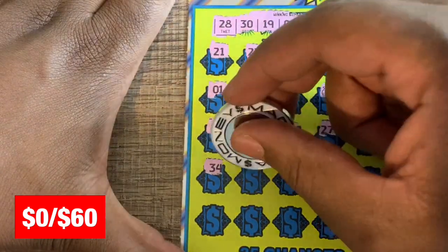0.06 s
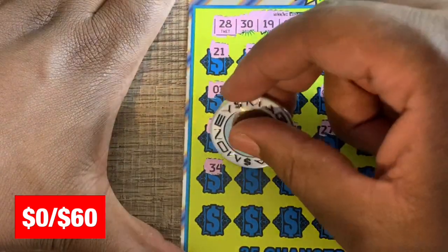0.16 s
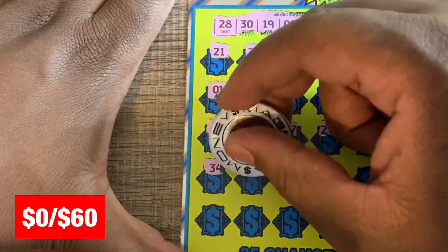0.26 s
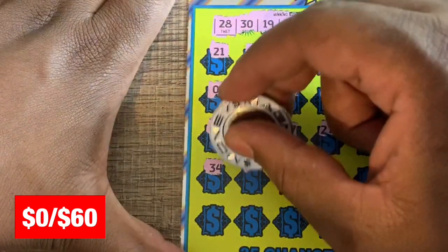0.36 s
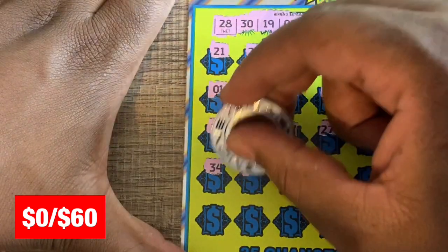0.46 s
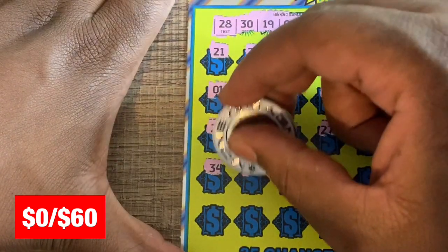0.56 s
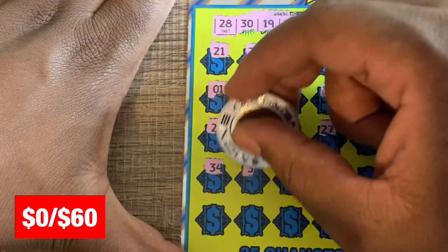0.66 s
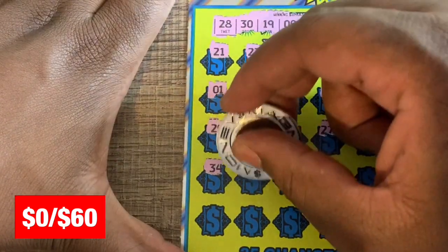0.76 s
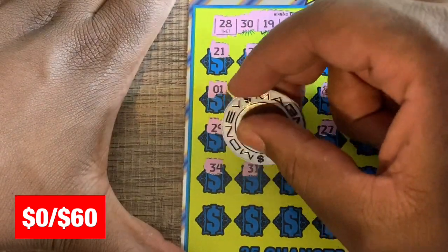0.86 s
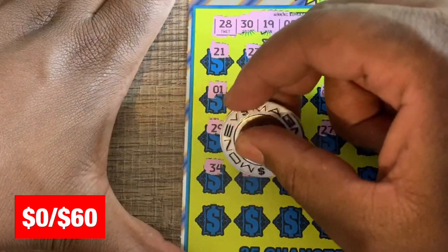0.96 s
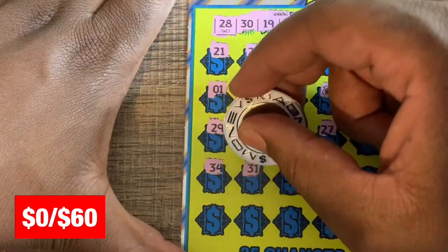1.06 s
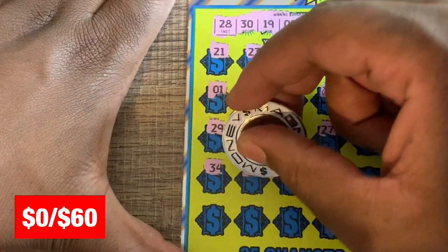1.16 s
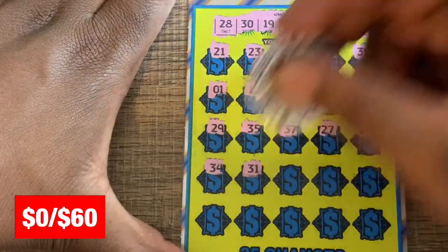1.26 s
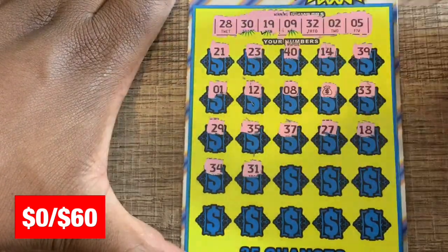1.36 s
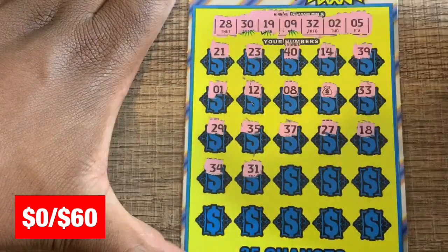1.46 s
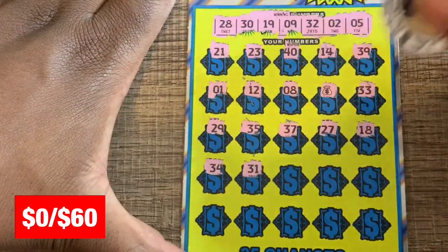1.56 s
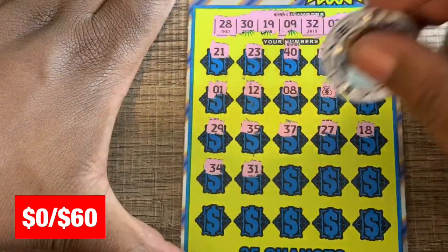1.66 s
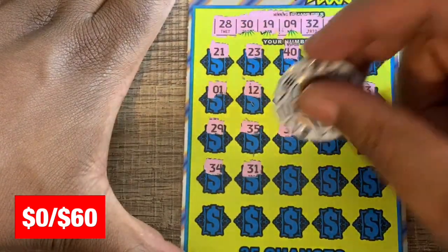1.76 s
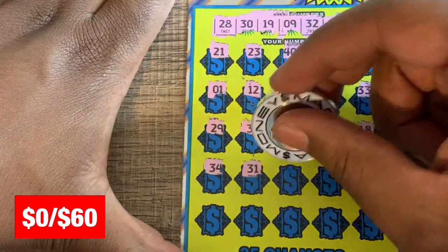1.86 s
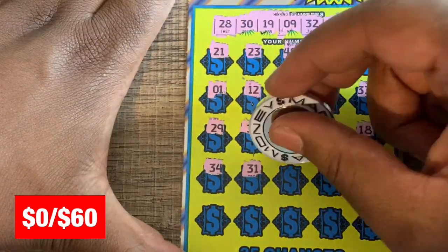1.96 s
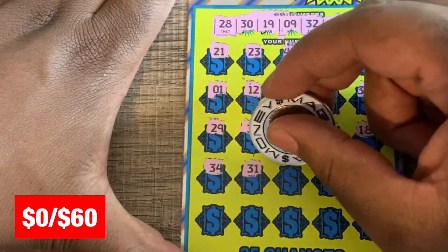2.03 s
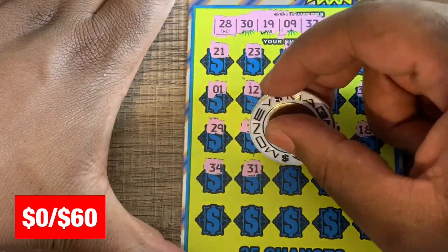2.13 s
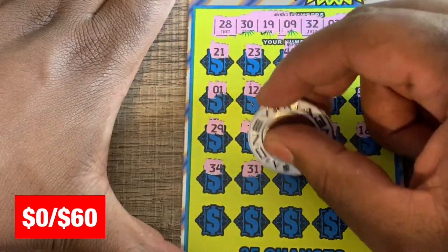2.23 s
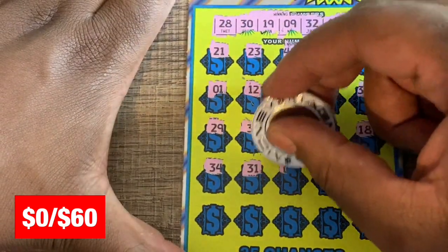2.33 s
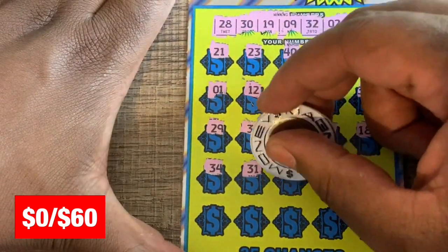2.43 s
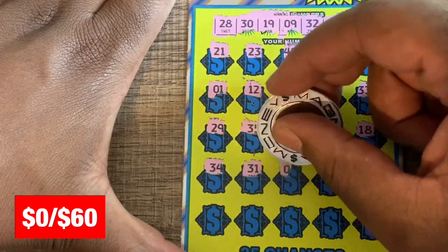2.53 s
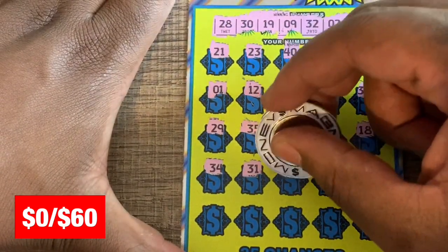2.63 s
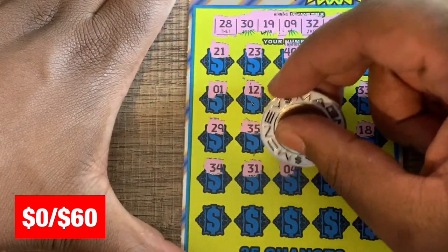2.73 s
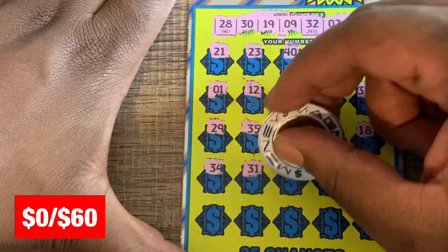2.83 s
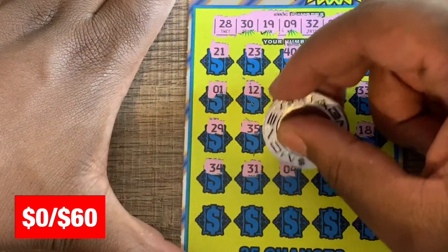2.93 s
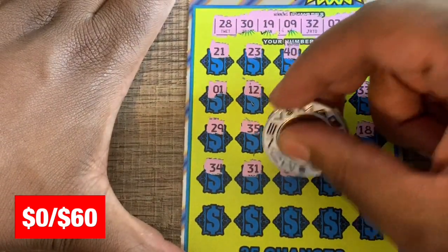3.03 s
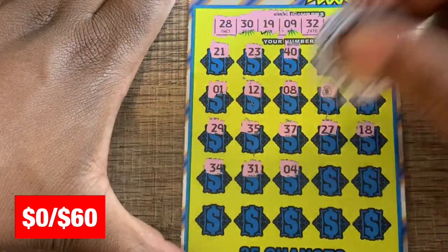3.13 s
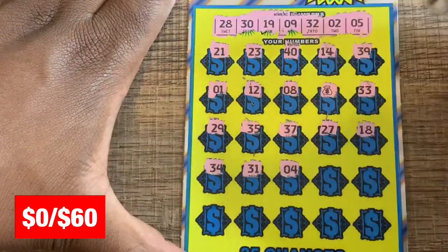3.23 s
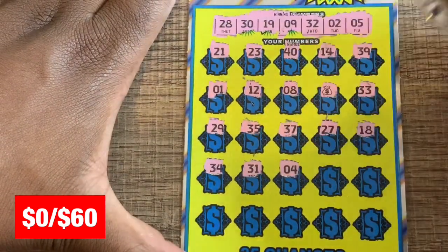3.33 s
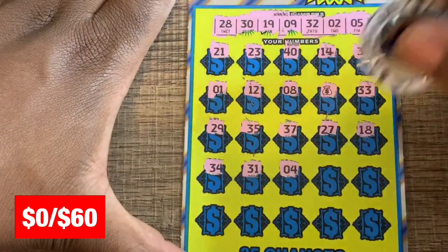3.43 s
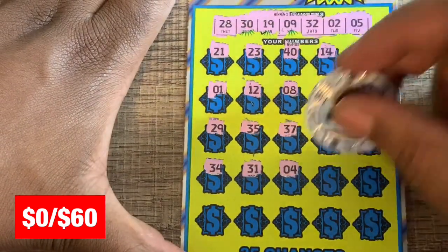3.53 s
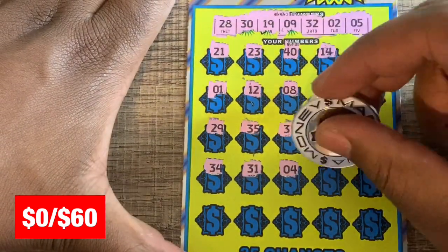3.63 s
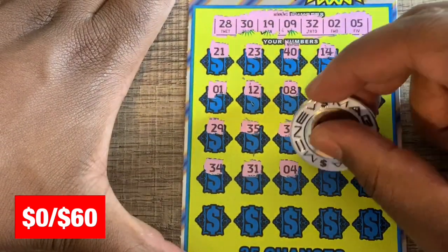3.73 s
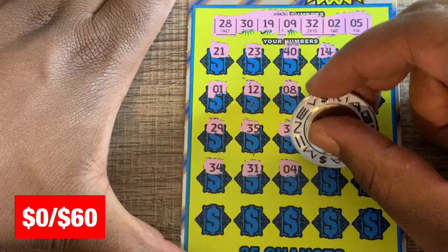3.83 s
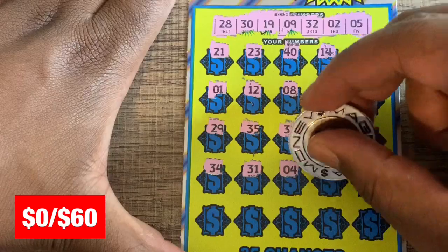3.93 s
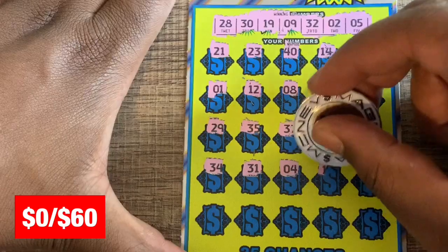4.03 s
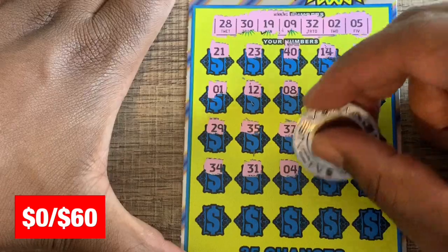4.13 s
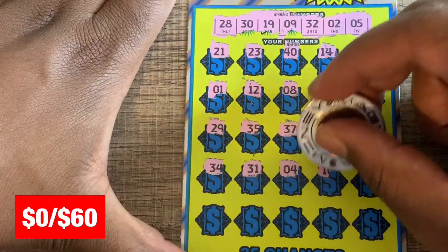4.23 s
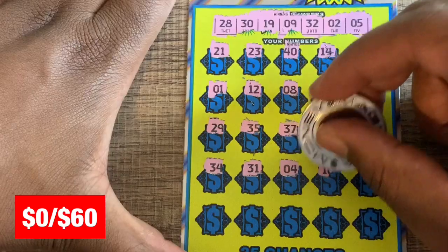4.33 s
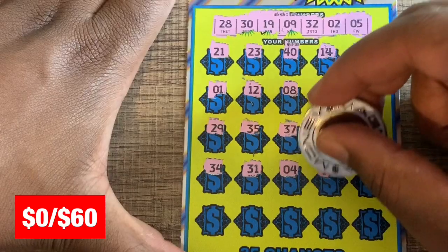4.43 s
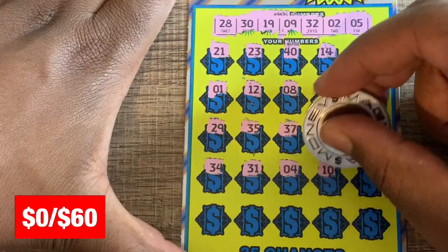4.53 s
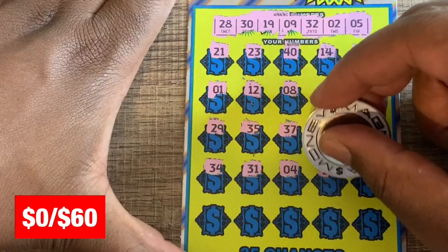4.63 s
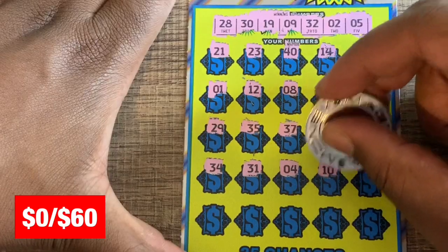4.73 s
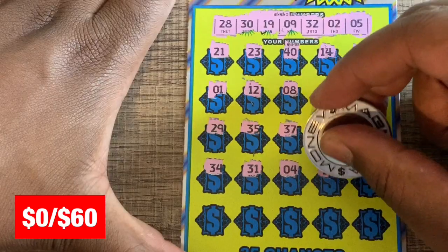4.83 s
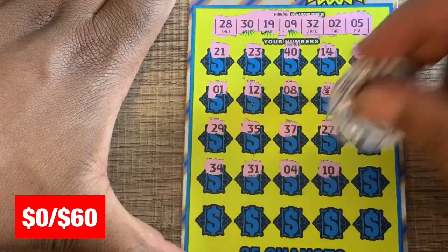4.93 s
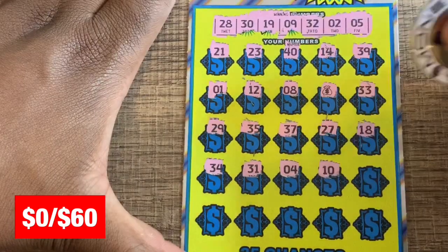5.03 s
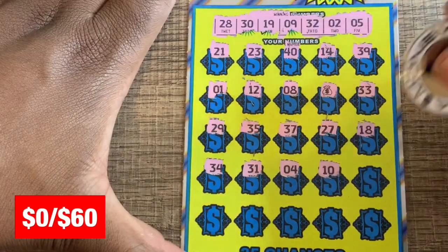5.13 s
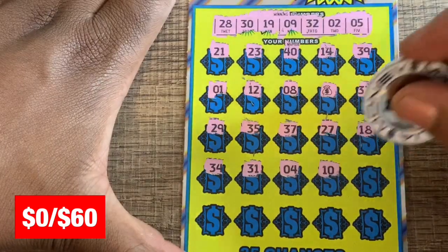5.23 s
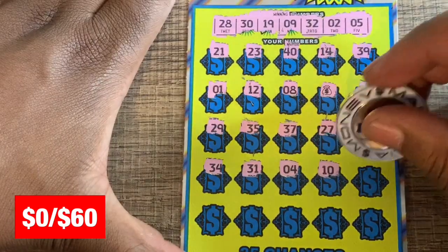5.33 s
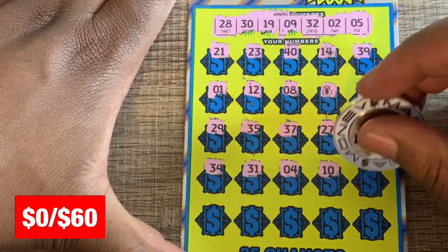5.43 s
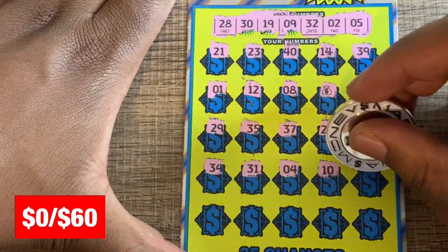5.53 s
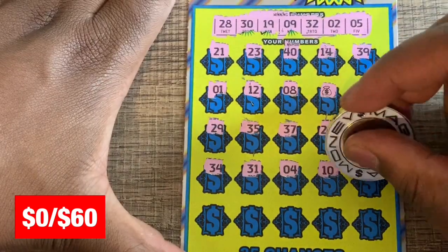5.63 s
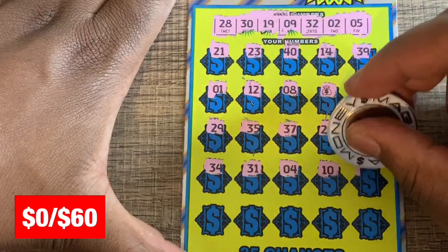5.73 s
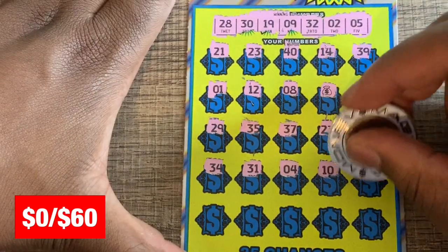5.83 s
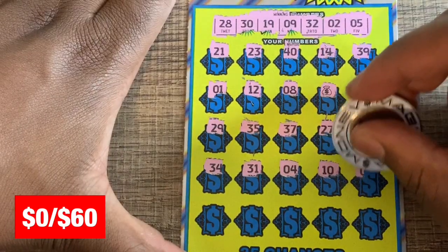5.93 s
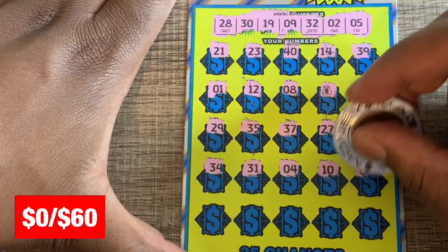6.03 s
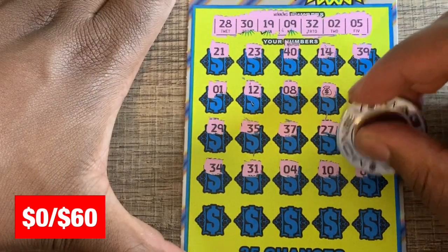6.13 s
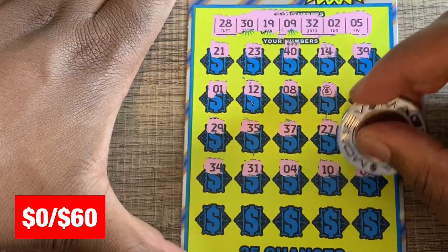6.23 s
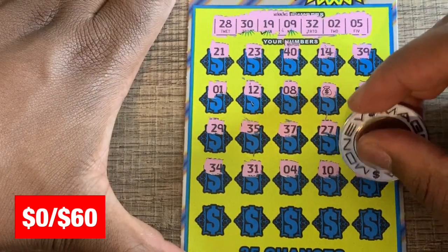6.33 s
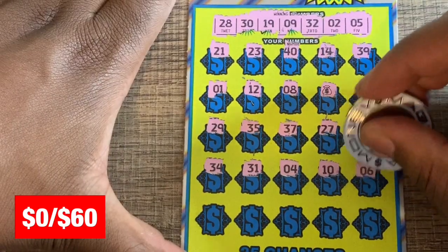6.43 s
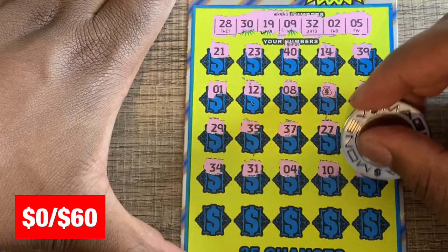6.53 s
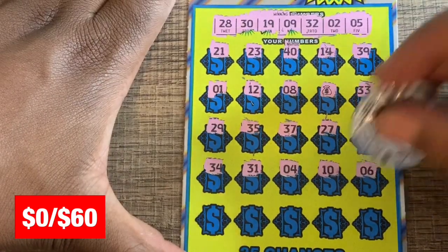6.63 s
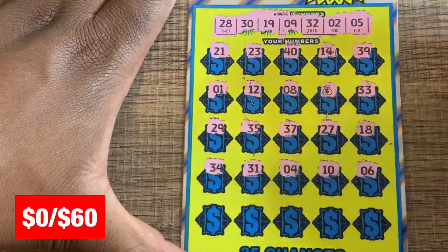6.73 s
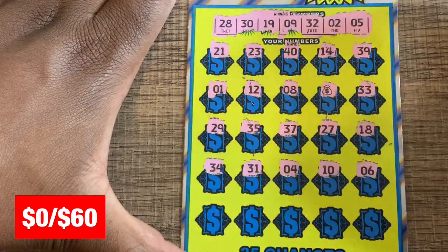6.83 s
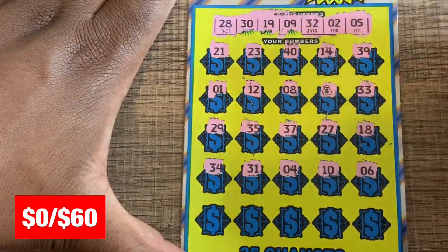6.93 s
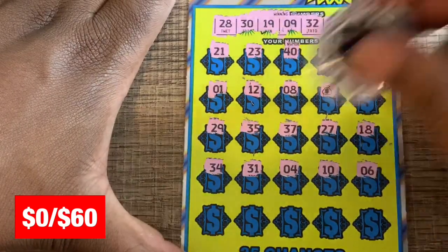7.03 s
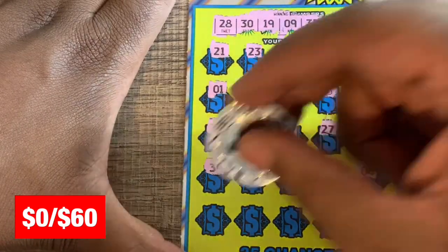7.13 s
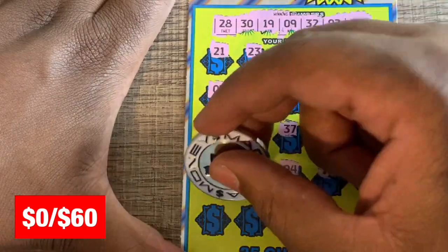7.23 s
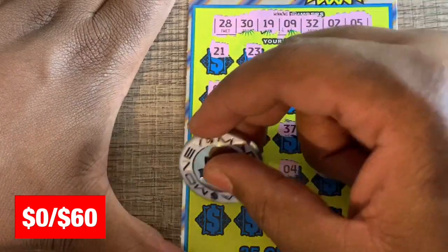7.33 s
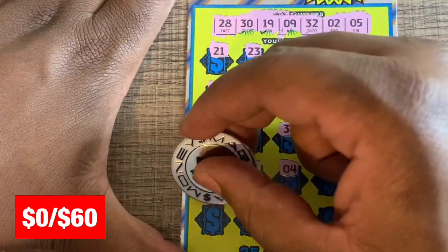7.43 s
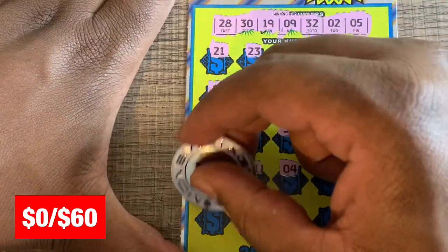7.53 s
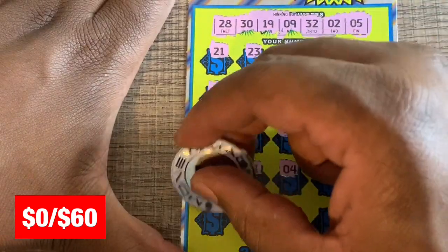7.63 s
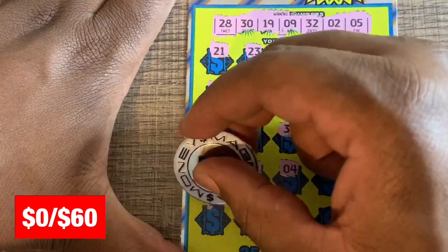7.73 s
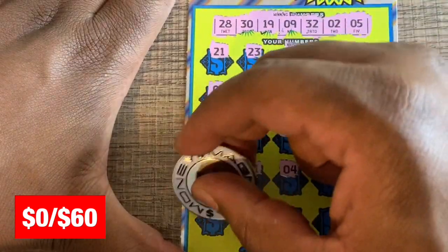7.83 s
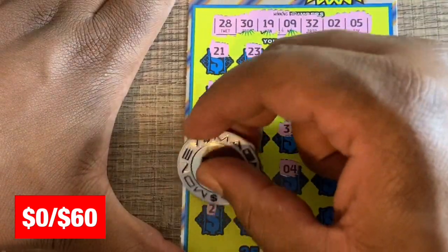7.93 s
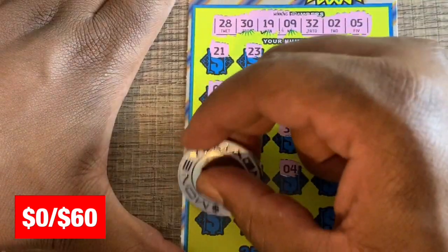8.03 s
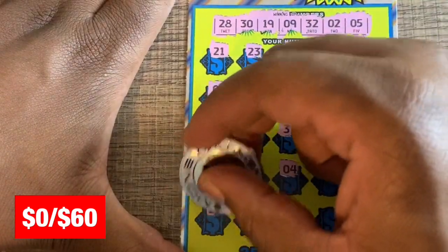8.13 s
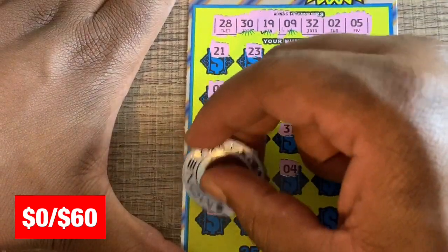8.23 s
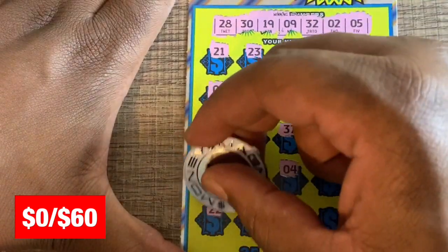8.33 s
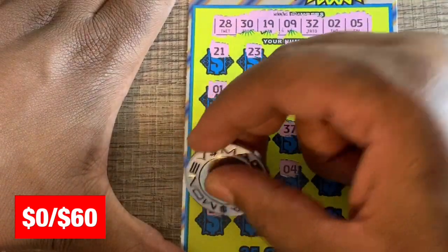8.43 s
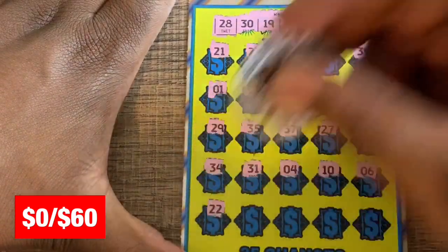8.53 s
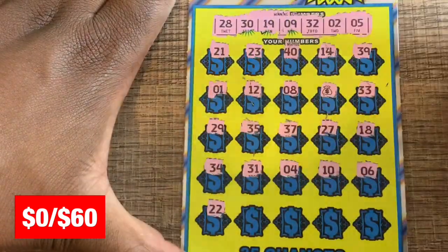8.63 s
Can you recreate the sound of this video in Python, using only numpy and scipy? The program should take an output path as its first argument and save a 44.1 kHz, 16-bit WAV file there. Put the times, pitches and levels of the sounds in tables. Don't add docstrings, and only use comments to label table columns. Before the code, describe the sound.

A metal token scratches coating off a paper card on a wooden table, very close to a stereo microphone in a quiet room. Five bursts of rapid back-and-forth scrapes each start with a sharp knock and end with a tick and soft brush of the hand. Light knocks, small squeaks and low table rumble mix with the scratching; faint hiss and hum fill the pauses.

```python
import sys
import numpy as np
from scipy import signal
from scipy.fft import rfft, irfft
from scipy.io import wavfile
from scipy.ndimage import uniform_filter1d

SR = 44100
rng = np.random.default_rng(int(sys.argv[2]) if len(sys.argv) > 2 else 0)


def bounce(signal):
    frames = np.transpose(np.atleast_2d(signal))
    limited = np.clip(frames, -1, 1)
    pcm = np.round(limited * 32767).astype(np.int16)
    wavfile.write(sys.argv[1], SR, pcm)


def voltage_ratio(decibels):
    exponent = np.asarray(decibels, float) / 20
    return 10 ** exponent


N = 383229
HZ = np.fft.rfftfreq(N, 1 / SR)

# (from [s], level of ring 1 [dB], of ring 2 [dB], of ring 3 [dB])
GRIPS = [
    (0, -1, -18, -0.7),
    (2, -18, -0.5, -3.5),
    (3.7, -1.5, -24, -0.5),
    (5.5, 7, -40, -0.5),
    (7.3, -13.5, -27, 2),
]
# (frequency [Hz], density [dB per Hz])
TABLE_COLOUR = [(70, -34), (130, -3), (260, -5.5), (400, -6), (520, -3), (760, -9.5), (1100, -2.5),
                (1600, -7.5), (1800, -12.5), (2100, -16), (2600, -20.5), (3400, -57.5)]
# (frequency [Hz], phase [rad])
PORT_PHASE = [(550, 0), (1030, -1.1), (1900, -9.4), (2400, -9.4), (3000, -12.9), (3900, -13.1),
              (4700, -15.6), (8200, -16.7), (16000, -1.4)]


def evened(x):
    return x / np.sqrt(np.mean(x ** 2) + 1e-20)


def read(points, hz):
    f, value = np.transpose(points)
    return np.interp(np.log(hz + 1), np.log(f + 1), value)


def add(mix, s, sound):
    part = mix[..., round(s * SR):][..., :sound.shape[-1]]
    part += sound[..., :part.shape[-1]]


def through(x, response):
    return signal.oaconvolve(np.atleast_2d(x), np.atleast_2d(response), axes=1)[:, :N]


def resonate(x, hz, width_hz):
    b, a = signal.iirpeak(hz, hz / width_hz, SR)
    return signal.lfilter(b, a, x) * np.sqrt(SR / (np.pi * width_hz))


def smooth_noise(size):
    noise = rng.standard_normal(N)
    return evened(uniform_filter1d(uniform_filter1d(noise, size), size))


def causal(colour, modes=(), size=8192):
    hz = abs(np.fft.fftfreq(size, 1 / SR))
    gain = voltage_ratio(read(colour, hz))
    for f, width_hz, db in modes:
        gain = gain * np.sqrt(1 + (voltage_ratio(2 * db) - 1) / (1 + (2 * (hz - f) / width_hz) ** 2))
    spectrum = np.exp(np.conj(signal.hilbert(np.log(gain + 1e-5))))
    response = np.fft.ifft(spectrum).real[:size // 2]
    return response / np.linalg.norm(response)


def ringing(t60_table, onset_s, gap=20, size=16384):
    taps = np.zeros((2, size))
    at = np.arange(0, size - gap, gap) + rng.integers(0, gap, (2, (size - 1) // gap))
    np.put_along_axis(taps, at, rng.choice([-1., 1.], at.shape), 1)
    hz, t, z = signal.stft(taps, SR, nperseg=512)
    t60_s = read(t60_table, hz)[:, None]
    tail = signal.istft(z * voltage_ratio(-60 * t / t60_s) / np.sqrt(t60_s), SR, nperseg=512)[1]
    tail *= np.clip(np.arange(tail.shape[1]) / SR / onset_s, 0, 1)
    return tail / np.linalg.norm(tail, axis=1, keepdims=True)


def off_the_hand(echo_db, count=6, size=90):
    taps = np.zeros((2, size))
    at = rng.integers(4, size, (2, count))
    np.put_along_axis(taps, at, voltage_ratio(echo_db) * rng.standard_normal((2, count)), 1)
    taps[:, 0] = 1
    return taps / np.linalg.norm(taps, axis=1, keepdims=True)


def grit(per_s, spread_db, flutter_db):
    slips = rng.standard_normal(N) * (rng.random(N) < per_s / SR)
    sizes = voltage_ratio(spread_db * np.minimum(rng.exponential(1, N), 4))
    pressure = voltage_ratio(flutter_db * smooth_noise(150))
    return evened(slips * sizes * pressure)


def away_from(peak, size):
    u, peak = np.linspace(0, 1, size), np.clip(peak, .08, .92)
    return 1 - np.minimum(u / peak, (1 - u) / (1 - peak))


def run_at(s):
    return np.searchsorted([grip[0] for grip in GRIPS], s, "right") - 1


def patchy(x, patch_db):
    z = signal.stft(x, nperseg=256)[2]
    field = uniform_filter1d(rng.standard_normal(z.shape[1:]), size=3, axis=0)
    field = uniform_filter1d(field, size=20, axis=1)
    return signal.istft(z * voltage_ratio(patch_db * evened(field)), nperseg=256)[1][:, :N]


def room_tone():
    # (frequency [Hz], density [dB per Hz])
    floor_colour = [(15, -63.5), (25, -32.5), (50, -14.5), (242, -11.5), (650, -17.5), (800, -21),
                    (5500, -29.5), (8700, -28.5), (13200, -29), (15200, -30), (16000, -39)]
    # (frequency [Hz], level [dB])
    hum_partials = [(59.2, -86), (118.4, -83), (387.6, -91.5)]
    floor_db = -83
    colour = voltage_ratio(read(floor_colour, HZ))
    colour /= np.sqrt(np.sum(colour[(HZ > 500) & (HZ < 8000)] ** 2) * 2 / N)
    hiss = voltage_ratio(floor_db + 2.5) * irfft(rfft(rng.standard_normal((2, N))) * colour, N)
    t = np.arange(N) / SR
    waver = voltage_ratio(3.0 * smooth_noise(1500))
    hum = sum(voltage_ratio(db + 3.0) * np.sin(2 * np.pi * hz * t) for hz, db in hum_partials)
    return hiss, waver * hum


def rumble():
    # (frequency [Hz], density [dB per Hz])
    rumble_colour = [(15, -68.5), (25, -26.5), (38, 9.5), (54, 5), (119, 0), (222, -10), (254, -13.5),
                     (300, -15), (390, -26.5), (660, -120)]
    # (down [s], lift [s], level [dB])
    leans = [
        (0.025, 1.222, -55.5),
        (1.93, 3.103, -56),
        (3.634, 4.965, -55),
        (5.483, 6.628, -57),
        (7.304, 8.283, -54.5),
        (1.3, 1.55, -67),
        (3.12, 3.437, -64),
        (7.0, 7.2, -74),
    ]
    # (time [s], level [dB])
    jolts = [(0.809, -51.5), (1, -55.5), (1.936, -46), (2.376, -45), (2.748, -48.5), (3.64, -48),
             (4.05, -48), (4.32, -51), (4.52, -53), (4.7, -51.5), (4.898, -54.5), (5.85, -50),
             (6.01, -49.5), (6.619, -61), (7.754, -44), (8.119, -50)]
    # (frequency [Hz], t60 [s], level [dB])
    jolt_modes = [(54.6, 0.24, -2.5), (106, 0.083, 5.5)]
    rise_s, lift_db_per_s, rest_db = 0.022, 181.5, -74
    t = np.arange(N) / SR
    weight = voltage_ratio(rest_db)
    for down_s, lift_s, db in leans:
        lifted_db = lift_db_per_s * np.maximum(t - lift_s, 0)
        weight = weight + np.clip((t - down_s) / rise_s, 0, 1) * voltage_ratio(db - lifted_db)
    noise = rfft(rng.standard_normal((2, N)))
    alike, unlike = evened(irfft(noise * voltage_ratio(read(rumble_colour, HZ)), N))
    out = (alike + voltage_ratio(-0.5) * np.outer([1, -1], unlike)) * weight * voltage_ratio(-7.0)
    t = t[:SR // 2]
    jolt = sum(voltage_ratio(db - 60 * t / t60_s) * np.sin(2 * np.pi * hz * t) for hz, t60_s, db in jolt_modes)
    jolt = jolt * np.minimum(t / .012, 1)
    for s, db in jolts:
        add(out, s, voltage_ratio(db + 3) * jolt[None])
    return out


def pings():
    # (time [s], peak [dB], pitch [Hz], swell
    # [s])
    ping_events = [(.243, -49.5, 208, .008), (0.46, -49.5, 226, 0.0073), (.602, -47, 222, 0.0088),
                   (2.279, -54, 214, .008), (2.6, -53, 210, 0.0076), (2.892, -51.5, 151, 0.0097),
                   (3.78, -51.5, 221, 0.0085), (4.6, -50.5, 255, 0.0073), (4.748, -48, 313, .006),
                   (5.634, -56, 196, 0.0087), (6.388, -56.5, 155, 0.0091), (7.322, -46.5, 195, 0.0056),
                   (7.424, -47, 186, 0.0095), (7.493, -49.5, 212, 0.012), (7.675, -50.5, 253, .008),
                   (7.839, -45, 213, 0.0093), (8.006, -53.5, 221, 0.0087), (8.191, -52, 222, 0.01),
                   (1.72, -63.5, 145, .015), (1.2, -60, 134, 0.0145), (8.33, -59, 130, .015),
                   (6.26, -54, 277, 0.012), (3.02, -58.5, 580, 0.0095), (3.636, -41, 1000, 0.00298),
                   (.275, -51, 1510, 0.019), (0.8, -50.5, 1505, 0.019), (3.63, -33.5, 4610, .001),
                   (3.63, -43.5, 3170, .0012), (3.634, -63, 4530, 0.022), (7.425, -60, 1400, 0.011),
                   (7.425, -56, 1020, 0.012), (7.482, -50, 1580, 0.0063), (7.5, -46, 1800, .008),
                   (7.488, -54, 2290, .009), (3.765, -51, 1580, 0.0045), (3.94, -47, 1570, .006),
                   (3.935, -54, 2150, 0.0081), (2.469, -42, 1100, .0005), (8.182, -48, 2750, .0004),
                   (4.4894, -44, 2540, .0004), (.6237, -38.5, 2830, .0004), (3.9485, -36, 1260, .0005),
                   (3.1, -50, 2600, 0.00035), (7.8298, -44, 3300, .0004), (2.1692, -46, 3800, .0005)]
    out = np.zeros((2, N))
    for s, db, hz, swell_s in ping_events:
        t = np.arange(round(8 * swell_s * SR)) / SR
        bell = (t / swell_s * np.exp(1 - t / swell_s)) ** 1.5
        lead = np.array([[0], [-np.interp(hz, *np.transpose(PORT_PHASE))]])
        add(out, s, voltage_ratio(db) * bell * np.sin(2 * np.pi * hz * t + lead))
    return out


def brushes():
    # (start [s], length [s], top [dB], table re top [dB], place of the top [0-1])
    sweeps = [(0, 0.094, -83.5, 24, 0.8), (1.219, 0.12, -58.5, -9, 0.21), (1.329, .17, -65, -6, 0.26),
              (1.484, 0.14, -76, -12, 0.35), (3.069, 0.096, -62.5, -4.5, 0.18), (3.148, 0.18, -67, 2, 0.36),
              (3.273, 0.26, -81, 11, 0.27), (4.891, 0.083, -68.5, -3, 0.25),
              (4.938, 0.17, -63.5, -13, 0.08), (5.477, 0.042, -73.5, 19.5, 0.4),
              (6.594, 0.18, -62, -34, 0.59), (6.823, 0.34, -66, -19.5, 0.42),
              (8.443, 0.1, -58.5, -16, 0.28), (8.521, 0.24, -61, -18, 0.41)]
    # (frequency [Hz], density [dB per Hz])
    brush_colour = [(700, -23), (1200, -12.5), (1560, -5), (1900, -9.5), (2600, -3.5), (3800, -3),
                    (5000, -7.5), (8000, -7.5), (13000, -11.5), (15500, -17), (16200, -27.5)]
    # (frequency [Hz], width [Hz], level [dB])
    card_mode = (1565, 61, 6.6)
    edge_db, roundness = -17.5, 1.74
    level = np.zeros((2, 1, N))
    for s, length_s, db, table_db, peak in sweeps:
        edge = away_from(peak, round(length_s * SR))
        sweep = voltage_ratio(edge_db * edge ** roundness) * np.minimum((1 - edge) / 0.064, 1)
        add(level, s, voltage_ratio([db, db + table_db])[:, None, None] * sweep)
    skin = np.array([grit(15000, spread_db=0.0, flutter_db=0.5) for port in range(2)])
    swish = patchy(through(level[0] * skin, causal(brush_colour, [card_mode])), patch_db=2)
    rubbed = through(level[1] * skin, causal(TABLE_COLOUR, TABLE_MODES))
    return voltage_ratio(3.0) * swish, voltage_ratio(-2.0) * rubbed


# (frequency [Hz], width [Hz], level [dB])
TABLE_MODES = [(250.5, 28.6, 7.5), (305, 13, 0.5), (513, 16, 1), (845, 16, 5), (1004, 170, 1.5),
               (1161, 20, 5), (1121, 20, -15), (1598, 69, 6)]


def squeaks():
    # (start [s], length [s], level [dB])
    catches = [(0.249, 0.036, -50), (0.425, 0.018, -45.5), (0.606, 0.032, -46), (0.96, 0.04, -54),
               (2.274, .032, -51.5), (2.448, 0.045, -49.5), (2.629, 0.034, -53.5), (2.817, 0.033, -55.5),
               (4.097, 0.029, -54.5), (4.672, 0.052, -58.5), (5.699, 0.039, -59), (6.077, 0.043, -60),
               (7.501, 0.031, -51), (8.179, .05, -54)]
    card_hz = [1546, 1555, 1544, 1680, 1588]
    out = np.zeros(N)
    for s, length_s, db in catches:
        size, hz = round(length_s * SR), card_hz[run_at(s)]
        tone = resonate(resonate(rng.standard_normal(6000), hz, 60), hz, 60)
        add(out, s, voltage_ratio(db) * evened(tone[-size:]) * signal.windows.tukey(size, .6))
    return out


def ticks():
    # (time [s], peak [dB], pitch [Hz], fizz re peak [dB])
    clicks = [(0.0951, -23.5, 2830, -11.5), (1.2034, -32, 3370, -3), (1.2381, -59, 3070, -12),
              (1.7215, -58, 3800, -22), (1.937, -17.5, 2470, -7), (3.049, -30.5, 3550, -9),
              (3.6311, -22, 4740, -1.5), (4.8869, -32.5, 3800, -7), (4.949, -32, 2440, -17.5),
              (5.4813, -25.5, 4460, -26), (5.5033, -39, 3770, -10), (6.5603, -46, 3020, 0),
              (6.6125, -38, 3670, -9), (6.8745, -47, 4770, -12.5), (7.3197, -43.5, 2990, 8),
              (8.459, -29.5, 2800, 2.5)]
    out, t = np.zeros((2, N)), np.arange(800) / SR
    for s, db, hz, fizz_db in clicks:
        noise = rng.standard_normal((2, 2, len(t)))
        body = np.sin(2 * np.pi * hz * t) * np.exp(-t / 0.00074)
        body = body + .5 * evened(resonate(noise[0], hz, 830)) * np.exp(-t / 0.0021)
        crack = evened(np.diff(noise[1], prepend=0)) * np.exp(-t / 0.0015)
        click = (body + voltage_ratio(fizz_db + 3.5) * crack) * np.minimum(t / 0.00082, 1)
        add(out, s - .0005, voltage_ratio(db - 7.0) * click)
    return out


def knocks():
    # (time [s], peak [dB], hollow ring re peak [dB], contact [ms], bounces re peak [dB])
    knock_events = [(0.093, -21.5, -19, 0.051, 0.1), (0.433, -40, -14, .08, -2),
                    (0.622, -33.5, -23, .05, -6), (0.805, -42.5, -20, .12, -3), (0.982, -33.5, -21, .07, 0),
                    (1.14, -41.5, -24, .06, 2), (1.358, -55.5, -14, .15, -3), (1.935, -20, -17, 0.054, 0.3),
                    (2.157, -40.5, -12.5, .08, -3), (2.705, -40, -20, .08, 2),
                    (3.635, -24, -12, 0.11, -5.5), (3.771, -52, -13, .08, 3),
                    (3.947, -31.5, -20, 0.048, -2), (4.301, -34, -15, 0.063, -1.5),
                    (4.488, -35, -23, 0.054, 0), (4.696, -43, -8.5, .08, 0.1),
                    (5.501, -26, -15.5, 0.11, -4), (5.825, -30.5, -19, 0.11, -7),
                    (6.008, -34.5, -28, .08, 1), (6.553, -49, -19, .08, 3), (7.322, -32, -16, 0.13, -6),
                    (7.49, -48, -18, .08, 0.1), (7.745, -39, -22, .08, 4)]
    # (frequency [Hz], density [dB per Hz])
    knock_colour = [(90, -32), (160, -9.5), (260, -2), (400, -11), (520, -3), (650, -11.5), (740, -9.5),
                    (860, -3), (960, -8.5), (1100, -4), (1250, -6.5), (1570, -11.5), (1900, -20),
                    (2730, -24.5), (6000, -44.5), (9000, -91.5)]
    # (frequency [Hz], width [Hz], level [dB])
    knock_modes = [(264, 18, 6), (518, 37, 4), (844, 22, 10.5), (1030, 9.9, 2.5), (1094, 7.3, 4.5),
                   (1566, 120, 3.5)]
    # (added to each knock mode [dB], ..)
    spots_db = [(1.5, -1, -2, .1, 1.5, .1), (5, 0, -0.5, .1, 0.5, 1), (-1.5, -7.5, -6.5, 3.7, 3, -1),
                (-2, -0.5, -2, .1, 1, -1.1), (0.5, 1.5, -9, 2, -2, .1)]
    # (frequency [Hz], t60 [s])
    hollow_modes = [(262, 0.15), (322, 0.23), (378, 0.17), (435, 0.072)]
    push_hz, push_start_hz, push_sag_s = 115, 522.5, .006
    thump_db, thump_follows_blow = -30.5, 0.63
    blows, thumps = np.zeros((2, N))
    t = np.arange(8000) / SR
    turns = push_hz * t + (push_start_hz - push_hz) * push_sag_s * (1 - np.exp(-t / push_sag_s))
    push = np.sin(2 * np.pi * turns) * np.exp(-t / 0.023)
    hollow = sum(np.sin(2 * np.pi * hz * t) * voltage_ratio(-60 * t / t60_s) for hz, t60_s in hollow_modes)
    hollow = hollow * np.minimum(t / 0.0035, 1)
    spots = []
    for spot_db in spots_db:
        modes = [(hz, width_hz, db + more_db) for (hz, width_hz, db), more_db in zip(knock_modes, spot_db)]
        spots.append(causal(knock_colour, modes))
    for s, db, hollow_db, contact_ms, bounces_db in knock_events:
        lightness_db = 0.81 * (db + 20) + bounces_db
        contact = np.exp(-.5 * ((1000 * t[:88] - 1) / contact_ms) ** 2)
        blow = signal.fftconvolve(contact / contact.sum(), spots[run_at(s + .1)])
        for late_s, bounce_db in ((.001, 0.86), (.0028, 2 + lightness_db), (.0068, 3 + lightness_db)):
            add(blows, s + late_s, voltage_ratio(db + bounce_db) * blow)
        thump = voltage_ratio(thump_db + thump_follows_blow * db) * push
        add(thumps, s + 0.0014, thump + voltage_ratio(db - 4.0 + 1.0 * hollow_db) * hollow)
    return voltage_ratio(12.5) * through(blows, off_the_hand(echo_db=-12)), thumps


def strokes():
    # (start [s], length [s], bite into coating [dB], table pressure [dB])
    pushes = [(0.122, 0.021, -65, -48), (0.222, 0.049, -53, -47), (0.39, 0.069, -55.5, -47),
              (0.575, 0.067, -53, -47), (0.748, 0.067, -54.5, -47.5), (0.942, 0.054, -63, -51),
              (1.136, 0.016, -69, -80), (2.237, 0.075, -55.5, -49.5), (2.416, 0.064, -50.5, -46),
              (2.603, 0.061, -56.5, -50.5), (2.785, 0.061, -55.5, -51), (2.946, 0.072, -72, -57),
              (3.757, 0.028, -58.5, -43.5), (3.911, 0.049, -51, -45.5), (4.07, 0.083, -56, -52.5),
              (4.281, 0.032, -57.5, -46), (4.457, 0.041, -57, -48), (4.666, 0.036, -56.5, -51),
              (4.823, 0.013, -58, -56), (5.614, 0.043, -50.5, -43), (5.782, 0.056, -55.5, -48.5),
              (5.977, 0.05, -53.5, -46), (6.16, 0.061, -64, -52), (6.354, 0.051, -56, -49.5),
              (7.477, 0.045, -53, -47.5), (7.725, 0.049, -56, -44.5), (7.894, 0.057, -56, -50.5),
              (8.065, 0.064, -58.5, -47), (8.249, 0.077, -64.5, -52.5)]
    # (start [s], length [s], bite into coating [dB], table pressure [dB])
    pulls = [(0.156, 0.047, -54.5, -47), (0.303, 0.084, -60, -47.5), (0.486, 0.075, -58, -50),
             (0.662, 0.081, -55.5, -50.5), (0.839, 0.082, -64.5, -49.5), (1.024, 0.086, -65.5, -53.5),
             (2.143, 0.067, -53.5, -48.5), (2.331, 0.07, -51, -48), (2.497, 0.082, -57, -50.5),
             (2.685, 0.071, -58.5, -48.5), (2.883, 0.065, -61, -50.5), (3.82, 0.069, -55.5, -46.5),
             (3.992, 0.069, -50, -47), (4.16, 0.088, -59.5, -51.5), (4.346, 0.071, -60, -51.5),
             (4.514, 0.094, -66.5, -51.5), (4.732, 0.071, -66.0, -54), (5.552, 0.034, -55, -46),
             (5.692, 0.076, -55.5, -48.5), (5.871, 0.076, -57.5, -49), (6.057, 0.067, -54, -49),
             (6.233, 0.068, -59.5, -48.5), (6.397, 0.11, -90, -56.5), (7.404, 0.056, -75, -49),
             (7.548, 0.071, -61, -50), (7.654, 0.038, -76, -52), (7.806, 0.065, -51.0, -46),
             (7.986, 0.07, -58.5, -49.5), (8.172, 0.065, -53.5, -52.5)]
    # (frequency [Hz], density [dB per Hz])
    scrape_colour = [(1200, -68.5), (1900, 5), (2600, 4.5), (3700, -1), (4700, -5), (5600, -11.5),
                     (7000, -35.5)]
    # (frequency [Hz], density [dB per Hz])
    fizz_colour = [(3800, -10), (5000, -2.5), (7000, 1.5), (9500, -20.5), (13000, 0.5), (15500, -6),
                   (16200, -65)]
    fizz_in_run_db = [-8.5, -9, -8.5, -13, -10]
    # (frequency [Hz], width [Hz], level [dB])
    token_modes = [(2200, 140, 3), (2740, 130, 3), (3040, 110, 5), (3590, 110, 5), (3800, 130, 3),
                   (10700, 250, 4), (12700, 350, 5)]
    # (pushed [Hz], pulled [Hz], width [Hz])
    token_rings = [(5850, 6170, 600), (6900, 7100, 2200), (8180, 8290, 270)]
    # (frequency [Hz], width [Hz])
    card_modes = [(1020, 70), (1596, 69), (1150, 80)]
    # (level of each card mode [dB], ..)
    card_in_run_db = [(-16, -18, -21), (-17, -18, -15.5), (-21, -16, -12.5), (-16.5, -22, -15.5),
                      (-10.5, -7.5, -21)]
    push_peak, pull_peak = 0.71, 0.46
    fizz_follows_pressure = 0.088
    drive, pushing = np.zeros((3, 2, N)), np.zeros(N)
    slips = grit(6000, spread_db=2.5, flutter_db=1.48)
    rows = sorted([(*row, push_peak) for row in pushes] + [(*row, pull_peak) for row in pulls])
    for start_s, length_s, db, table_db, peak in rows:
        speed = np.cos(np.pi / 2 * away_from(peak, round(length_s * SR))) ** 1.47
        fizz_db = fizz_in_run_db[run_at(start_s)] + fizz_follows_pressure * (table_db - db)
        scraped = speed * slips[round(start_s * SR):][:len(speed)]
        heard = signal.fftconvolve(scraped[None], off_the_hand(echo_db=-7), axes=1)
        add(pushing, start_s, np.full(len(heard[0]), float(peak == push_peak)))
        add(drive, start_s, voltage_ratio([db, db + fizz_db, table_db])[:, None, None] * heard)
    bite, fizz, pressure = drive
    air = through(bite, causal(scrape_colour, token_modes))
    air += through(fizz, causal(fizz_colour, token_modes))
    run, rings_db = run_at(np.arange(N) / SR), np.transpose(GRIPS)[1:]
    other_slips = fizz * rng.choice([-1., 1.], N)
    for (pushed_hz, pulled_hz, width_hz), db in zip(token_rings, rings_db):
        for hz, share in ((pushed_hz, pushing > 0), (pulled_hz, pushing == 0)):
            air += resonate(other_slips * (share * voltage_ratio(db[run])), hz, width_hz)
    for (hz, width_hz), db in zip(card_modes, np.transpose(card_in_run_db)):
        air += resonate(pressure * voltage_ratio(db[run]), hz, width_hz)
    return voltage_ratio(1.0) * air, voltage_ratio(-0.5) * through(pressure, causal(TABLE_COLOUR, TABLE_MODES))


def scene():
    # (frequency [Hz], t60 [s])
    table_t60 = [(100, 0.12), (300, 0.32), (600, 0.39), (1200, 0.34), (1700, 0.25), (2500, 0.48),
                 (6000, 0.041)]
    # (frequency [Hz], t60 [s])
    room_t60 = [(1500, 0.55), (4000, 0.26), (9000, 0.03), (15000, 0.045)]
    # (frequency [Hz], left re right [dB])
    left_shadow = [(400, 2), (520, 0), (700, 1.5), (1200, 1.5), (2500, 0.5), (4800, 1), (5900, -8),
                   (6900, -2.5), (9000, 0.5)]
    hiss, hum = room_tone()
    swish, rubbed = brushes()
    blows, thumps = knocks()
    air, pushed = strokes()
    air = air + ticks() + squeaks() * off_the_hand(echo_db=-19.0)[:, :1]
    pushed = pushed + rubbed
    wood, room = ringing(table_t60, onset_s=0.0019), ringing(room_t60, onset_s=0.0057)
    table = voltage_ratio(-1.0) * pushed + voltage_ratio(-2.5) * through(pushed, wood)
    table = table + voltage_ratio(1.0) * blows + voltage_ratio(-3.0) * through(blows, wood)
    near = air + voltage_ratio(-7.5) * through(air, room) + swish + table + pings()
    shadow_db = read(left_shadow, HZ) / 2
    near = irfft(rfft(near) * voltage_ratio([shadow_db, -shadow_db]), N)
    return near + hiss + hum + thumps + rumble()


def low_pass(x):
    return signal.sosfilt(signal.butter(12, 16370, fs=SR, output="sos"), x)


def record(dry):
    # (frequency [Hz], gain [dB])
    microphone = [(25, -21), (40, -7.5), (55, 5), (15800, -0.5), (16400, -29.5), (16700, -58)]
    # (frequency [Hz], share of the left-right difference removed [0-1])
    shared_by_ports = [(150, 0.74), (350, 0.68), (520, 0.46), (750, 0.026), (1550, 0.14), (6500, 0.066),
                       (8700, 0.5), (10000, 1)]
    left, right = rfft(dry) * voltage_ratio(read(microphone, HZ))
    mid = (left + right) / 2
    side = (left - right) / 2 * (1 - np.clip(read(shared_by_ports, HZ), 0, 1))
    shift = np.exp(1j * np.interp(HZ, *np.transpose(PORT_PHASE)))
    mix = irfft(np.array([mid + side, (mid - side) * shift]), N)
    return low_pass(mix)


dry = scene()
out = record(dry)
bounce(out)
```